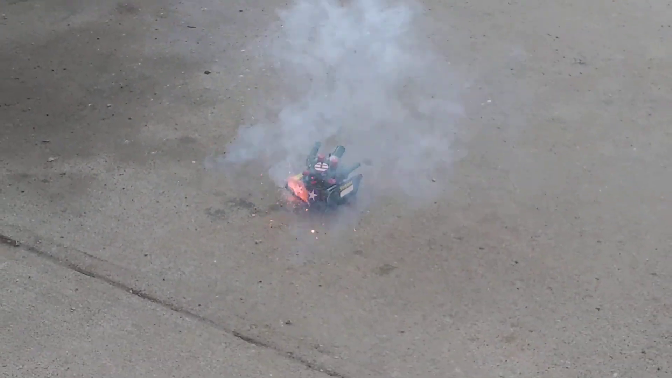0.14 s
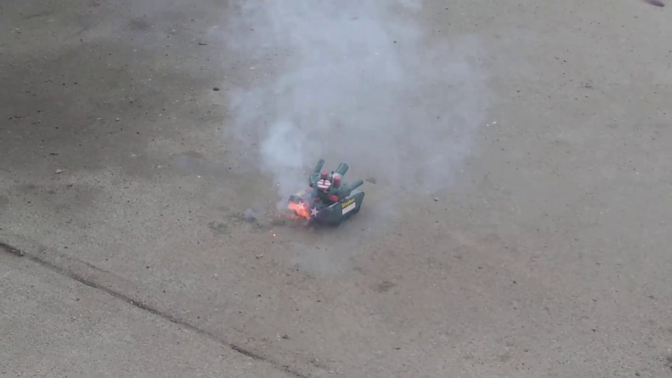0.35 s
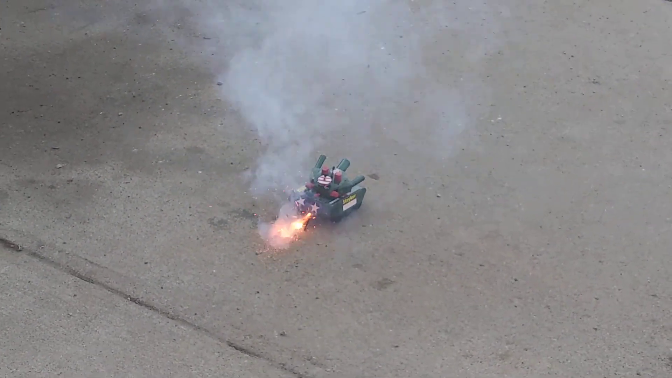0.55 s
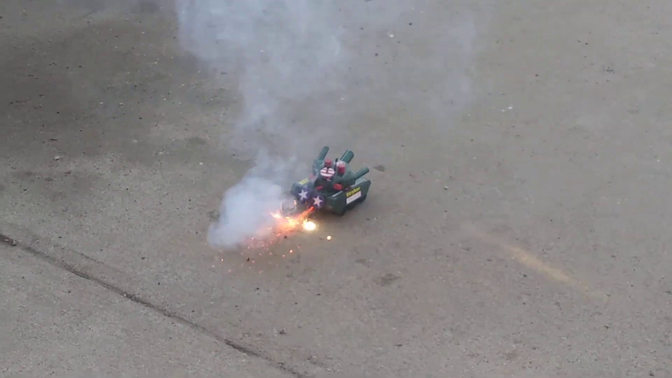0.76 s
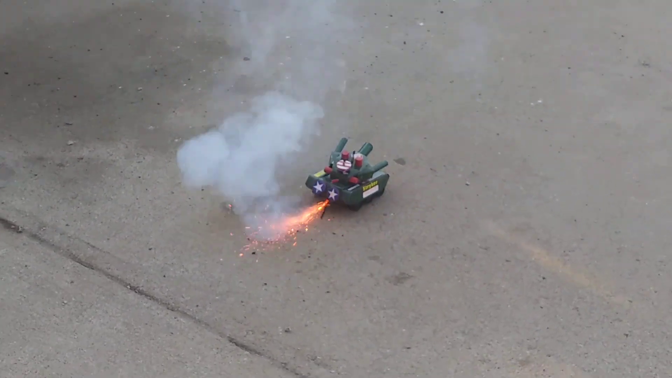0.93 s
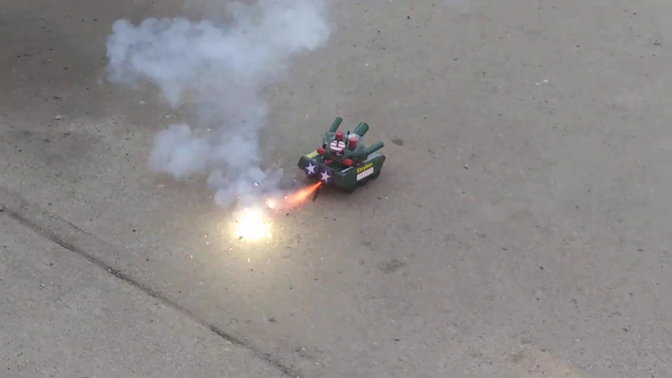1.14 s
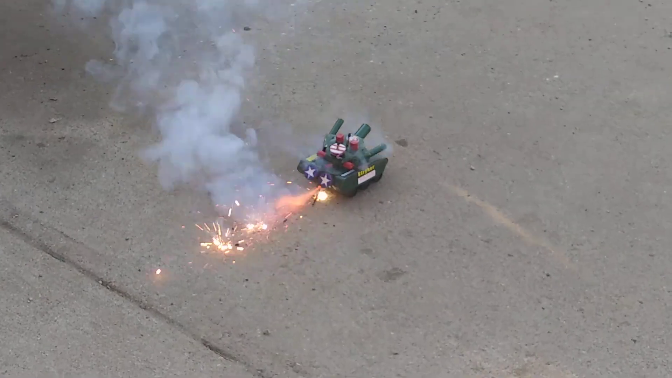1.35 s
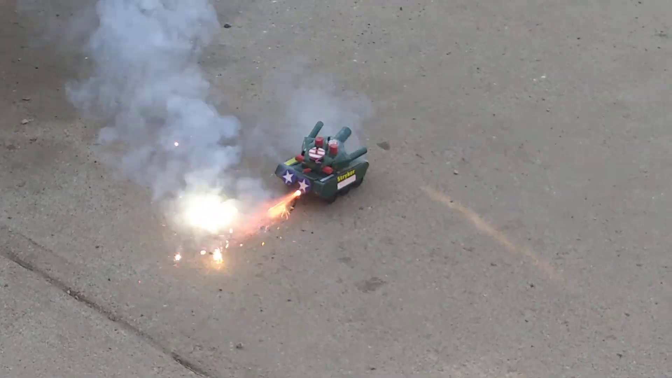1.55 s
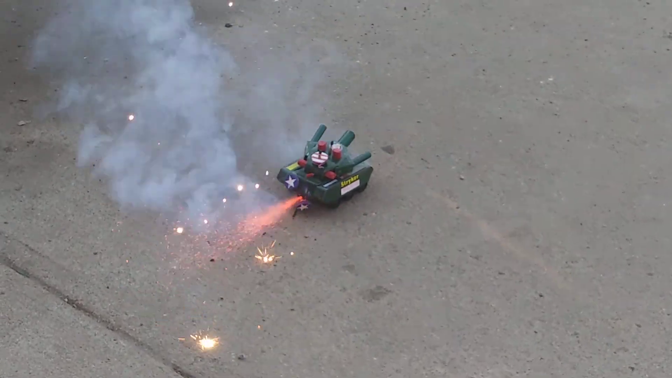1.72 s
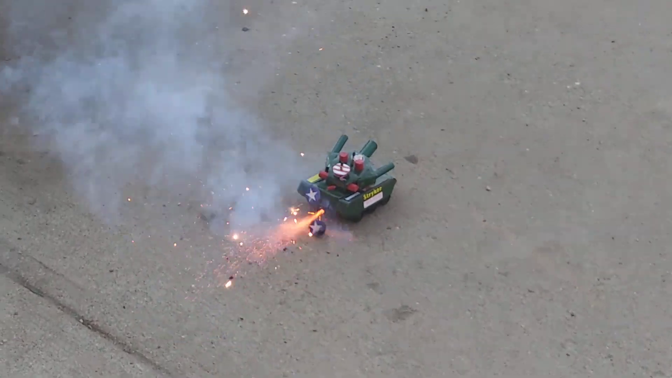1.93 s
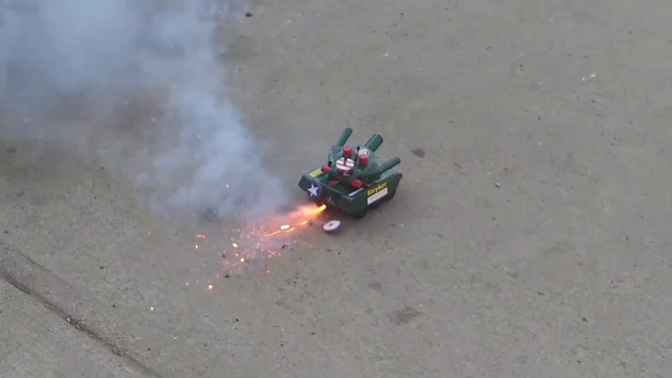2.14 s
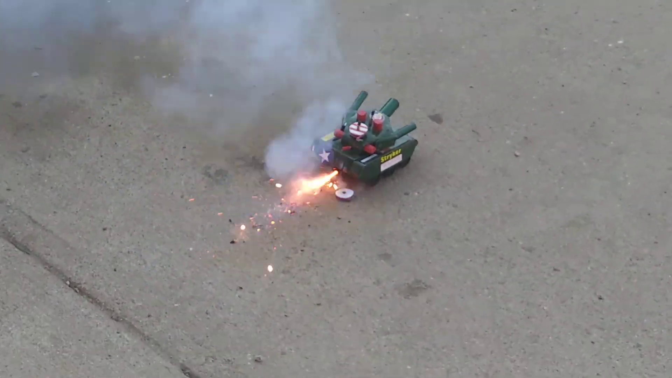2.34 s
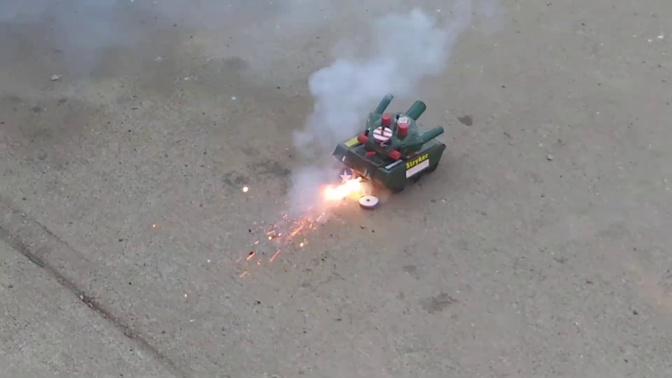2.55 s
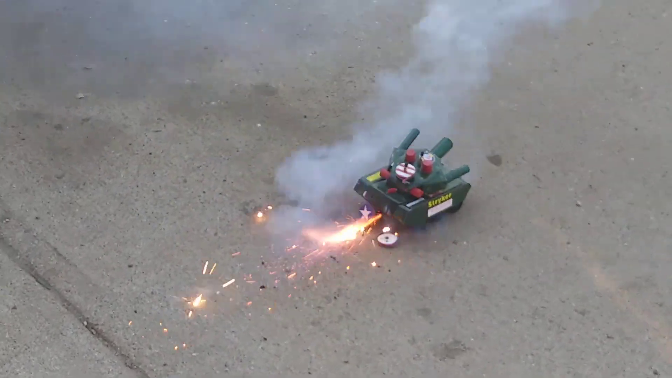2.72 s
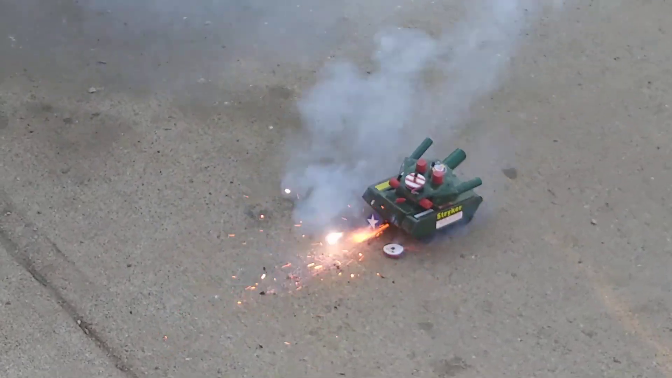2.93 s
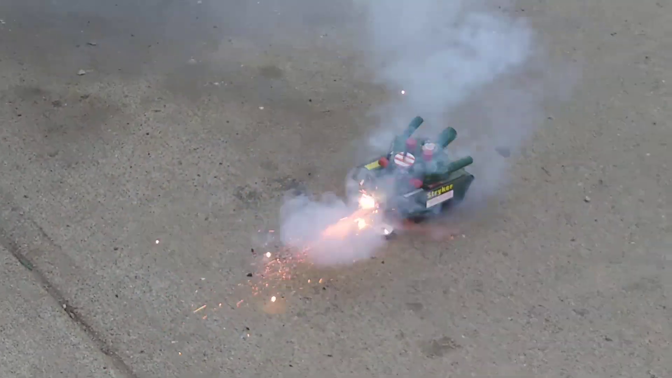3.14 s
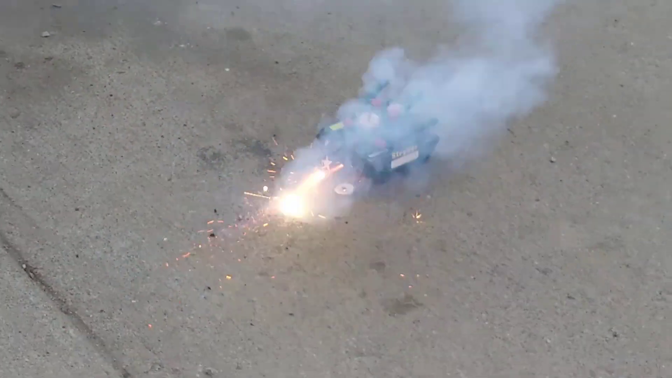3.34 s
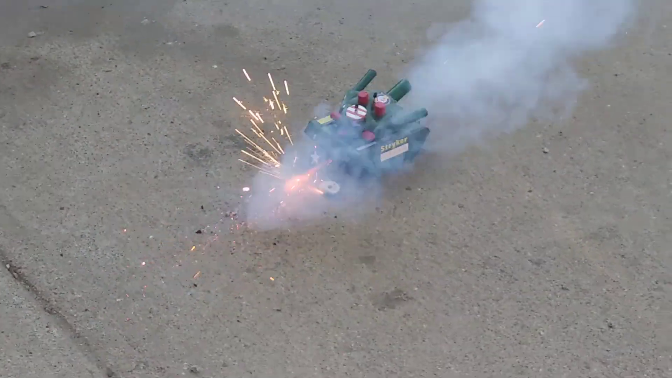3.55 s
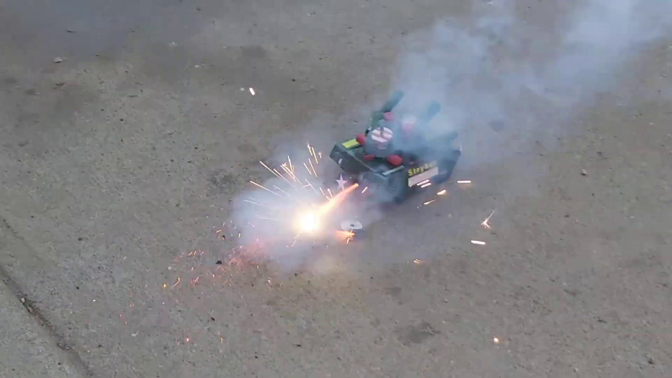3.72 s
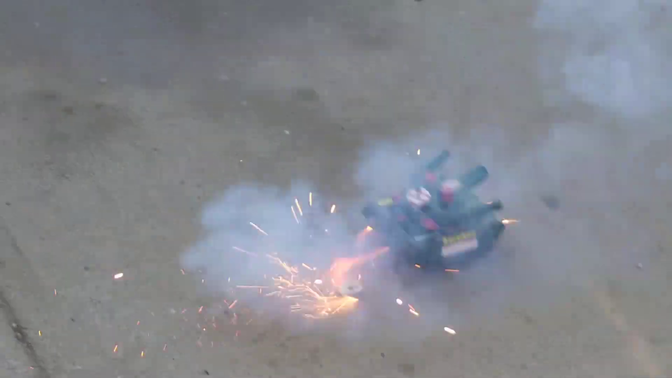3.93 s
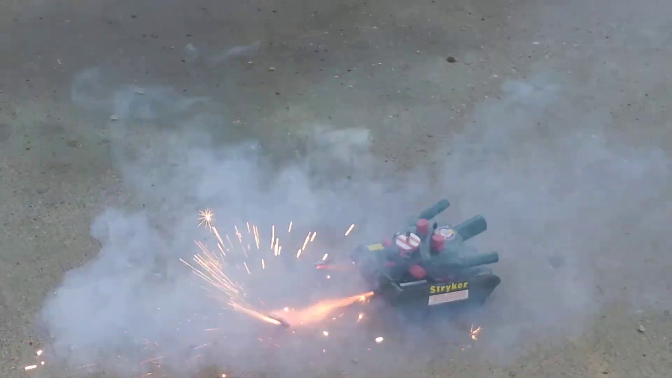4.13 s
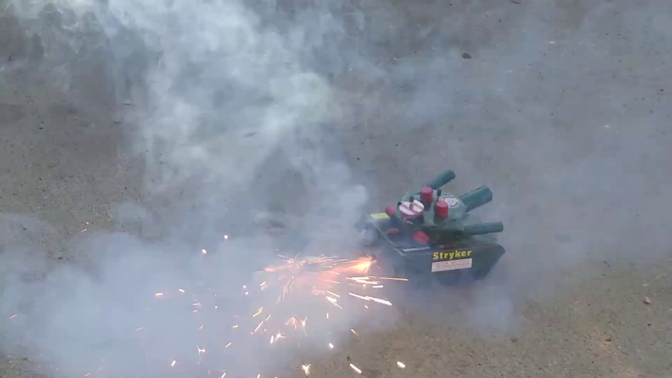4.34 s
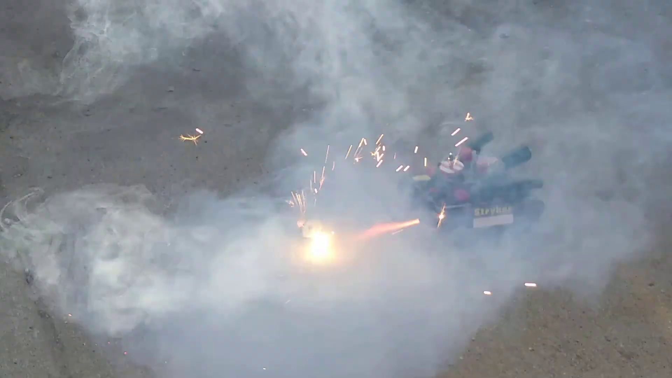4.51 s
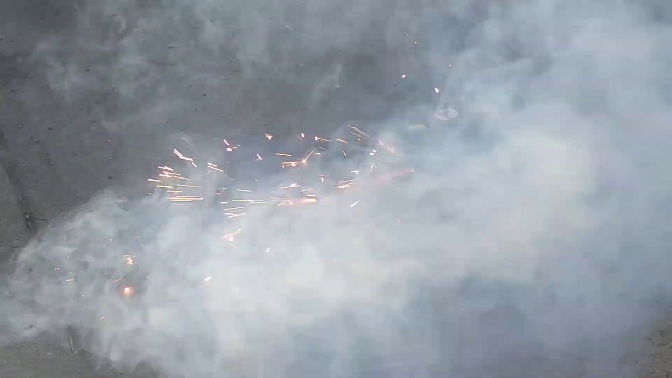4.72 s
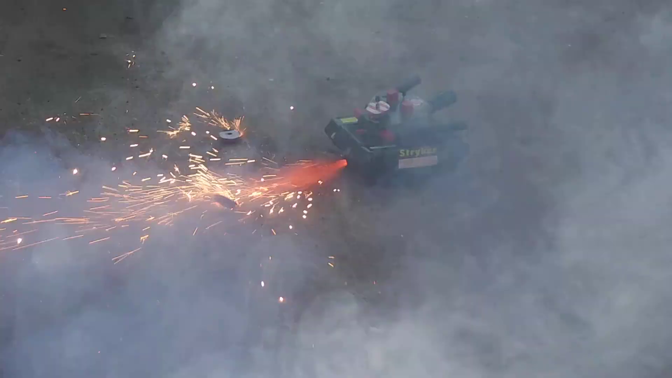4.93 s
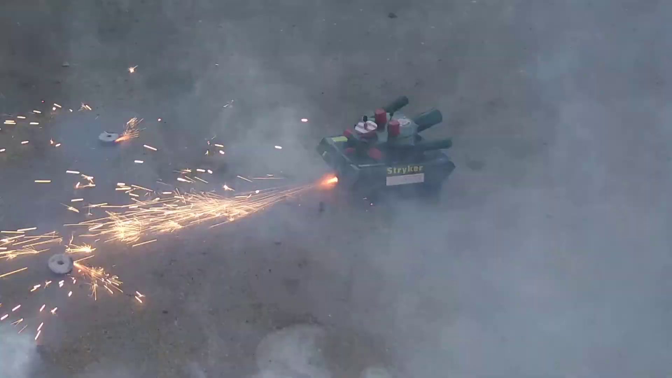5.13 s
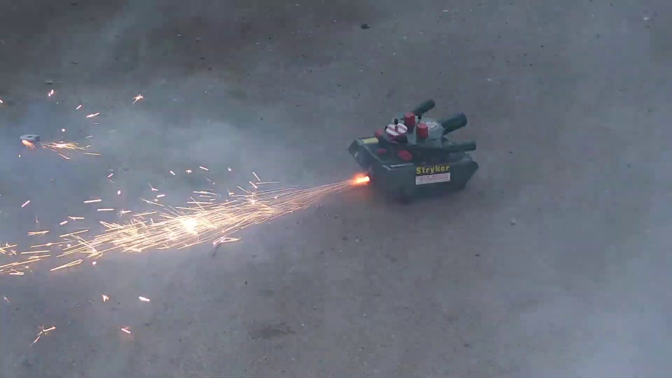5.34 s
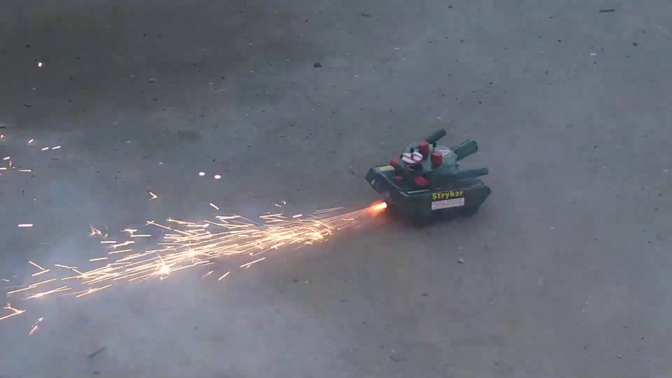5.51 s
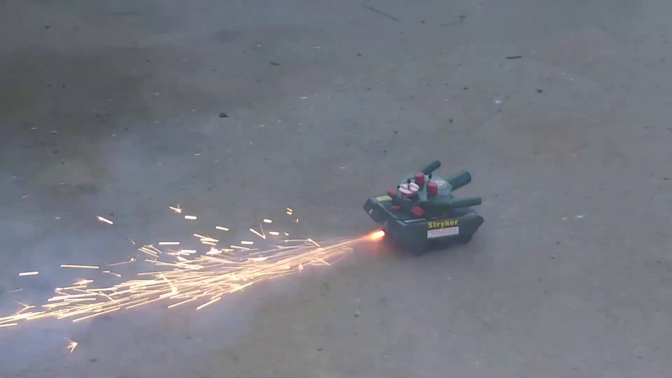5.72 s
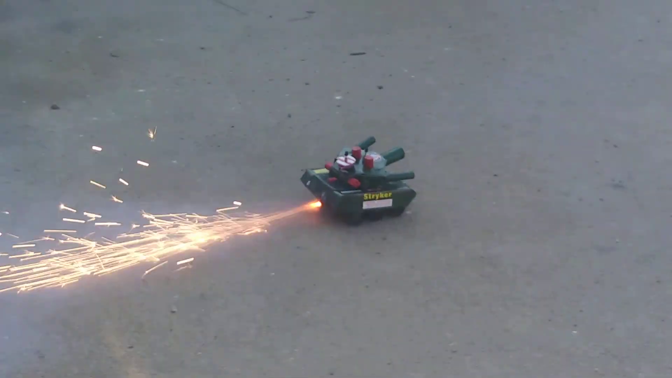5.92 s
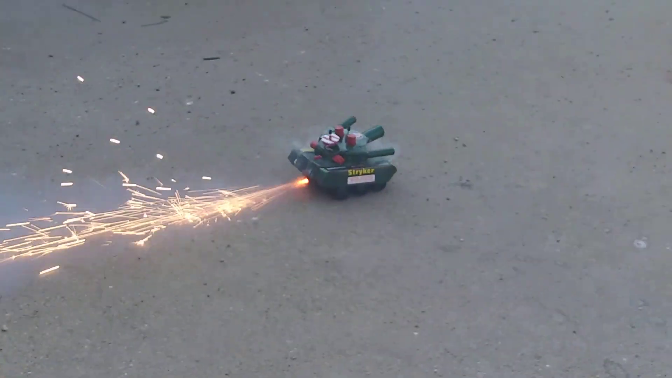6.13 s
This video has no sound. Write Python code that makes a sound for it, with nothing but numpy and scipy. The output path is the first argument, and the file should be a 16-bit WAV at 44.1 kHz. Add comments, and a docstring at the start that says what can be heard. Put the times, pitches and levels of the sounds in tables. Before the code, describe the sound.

A small firework burns on concrete outdoors, close to the microphone. From 0 to 1 s it is a soft, grainy fizz, uneven and crackling, with clusters of tiny dry pops and brief flaring puffs; a brighter sizzle comes in around 0.5 to 1 s. From about 1.1 s it strengthens, and from 1.8 to 3 s it becomes a smoother, narrow jet hiss over a low flutter, still dotted with pops. From 3.3 s it turns rough and sizzling again, swelling steadily, with stronger snaps and rushes near 3.8 to 4.3 s. At about 4.8 s a breathy chirp leaps into a very loud, shrill whistle near 3.9 kHz. It dips, jumps up at 4.9 s, goes hoarse, then slides slowly down to about 3.4 kHz, raspy, wobbling and roaring, slightly overloaded. The roar thickens again near 5.9 s, and the whistle is still sounding at the end. Faint short echoes surround it.

```python
"""A small firework fountain fizzes, spits and flares on concrete, close by: grains of powder make noise
leap and sink, and slag pops out of the nozzle as short pressure swings.
Then a whistle charge catches, screams, turns raspy and slides down in pitch as its tube burns hollow:
a wobbling tone with overtones, half tones and a roar, loud enough to overload the recorder.
Faint scattered echoes come back from the surroundings."""
import sys
import numpy as np
from scipy import signal
from scipy.fft import rfft, irfft
from scipy.io import wavfile

SR = 44100
rng = np.random.default_rng(int(sys.argv[2]) if len(sys.argv) > 2 else 0)


def wav_record(signal):
    """Record a signal, one row per channel, as 16-bit PCM in the file named by sys.argv[1]."""
    frames = np.transpose(np.atleast_2d(signal))
    bounded = np.clip(frames, -1, 1)
    # unit amplitude maps onto the largest positive 16-bit level
    quanta = np.round(bounded * 32767).astype(np.int16)
    wavfile.write(sys.argv[1], SR, quanta)


N = 272097
TIME = np.arange(N) / SR
BINS = np.fft.rfftfreq(N, 1 / SR)

# how fiercely the fountain burns, before trims and dips: time_s, level_db
BURN_STRENGTH = [(0, -47), (.22, -46), (.34, -52), (.47, -45), (.56, -43.5), (.76, -44.5), (.83, -45),
                 (1.03, -44), (1.14, -40), (1.4, -35.5), (1.55, -37), (1.7, -39.5), (2.1, -38.5),
                 (2.22, -36), (2.44, -39.5), (2.51, -35), (3.0, -33), (3.18, -36), (3.28, -31.5),
                 (3.52, -31.5), (3.57, -29.5), (4.1, -29), (4.55, -26.5), (4.75, -22.5)]
# the powder burns through layers, each with its own sound; levels are relative to the flame, before trims:
# start_s, jet_hiss_db, spark_sizzle_db, nozzle_cleanness (0 to 1)
POWDER_LAYERS = [(0, -14, -36, 0.1), (.29, -8.5, -26, 0.03), (.545, -5.5, -16, 0), (.8, 0.5, -14, 0),
                 (.98, -5.5, -21.5, 0.4), (1.8, 0, -31.5, 0.98), (2.65, -2, -23, .88),
                 (3.06, -6.5, -24, 0.64), (3.33, -10.5, -24, 0.26), (3.55, -1, -12.5, 0.06),
                 (3.9, -3.5, -20.5, .05), (4.25, -7.5, -23, 0.2)]
LAYER_BLEND_S = 0.032
# the colour of each noise, all made equally loud later: frequency_hz, level_db (per Hz)
FLAME_SPECTRUM = [(40, -54), (110, -51), (190, -27.5), (290, -13), (450, -7.5), (700, -1.5), (1300, 1.5),
                  (1900, 1.5), (2600, -3), (4000, -7.5), (7000, -34)]
# the hiss of a ragged nozzle: frequency_hz, level_db (per Hz)
RAGGED_HISS_SPECTRUM = [(200, -65), (1500, -13), (3000, -0.5), (4400, 6), (5500, 4.5), (6500, -3),
                        (8000, -9.5), (10000, -48), (15000, -37)]
# the hiss of a cleanly running nozzle, with a low flutter of flame: frequency_hz, level_db (per Hz)
CLEAN_JET_SPECTRUM = [(120, -52), (200, -22), (300, -1), (500, 1.5), (900, -5), (2500, -13), (3500, -6.5),
                      (4300, 3.5), (5300, 3), (6100, -8.5), (7000, -14), (8000, -18), (10000, -39),
                      (15000, -44)]
# the sizzle of sparks: frequency_hz, level_db (per Hz)
SIZZLE_SPECTRUM = [(400, -70), (5000, 10), (8000, 4), (11500, 3.5), (14000, 1), (16000, -13)]
GRAIN_DEPTH_EARLY, GRAIN_DEPTH_LATE = 2.0, .95  # how unevenly the powder burns
CHOKE_DB, CHOKE_S = 2.5, .012  # slag narrows the nozzle just before each flare, and the fountain dips

# slag spat from the nozzle, before the low cut: start_s, peak_db, pitch_hz
SLAG_SPITS = [(.024, -24.5, 1390), (.048, -22, 1510), (.055, -19.5, 1180), (.067, -23, 1270),
              (0.086, -26.5, 1410), (.16, -28, 1360), (.167, -20.5, 2070), (.483, -26, 1310),
              (.509, -31, 1000), (.516, -25, 1180), (.524, -25.5, 1480), (.674, -28.5, 1200),
              (.742, -25, 1600), (.943, -24.5, 1390), (.981, -25, 1390), (1.017, -22, 1260),
              (1.068, -22, 1190), (1.202, -19.5, 1300), (1.238, -25, 1250), (1.508, -17.5, 1560),
              (1.587, -20, 1280), (1.623, -20.5, 1130), (2.001, -20.5, 1200), (2.108, -23, 1340),
              (2.393, -22, 1170), (2.657, -17, 1300), (2.694, -22.5, 1300), (2.773, -19, 1135),
              (3.057, -17.5, 1020), (3.167, -20, 2330), (3.348, -15, 1410), (3.824, -19, 1340),
              (3.868, -17, 1940), (3.918, -17, 1600), (4.139, -14, 1540), (4.194, -15, 1720),
              (4.268, -15.5, 1420), (4.291, -14.5, 1370), (4.732, -13, 1690)]
# grains that flare with a short rush, before their rise and the low cut: start_s, level_db
GRAIN_FLARES = [(.047, -35), (.159, -32.5), (.195, -39.5), (.282, -40.5), (.377, -41.5), (.739, -37.5),
                (0.944, -36), (0.979, -39), (1.019, -39.5), (1.06, -34), (1.239, -29.5), (1.382, -34),
                (1.586, -37), (1.624, -32), (1.742, -33), (1.999, -32.5), (2.1, -32), (2.327, -32),
                (2.477, -31), (2.693, -30.5), (2.772, -30), (2.969, -29), (3.167, -32), (3.82, -27),
                (3.912, -23.5), (4.192, -30)]
# the colour of a flare: frequency_hz, level_db (per Hz)
FLARE_SPECTRUM = [(100, -40), (200, -28), (350, 1), (1500, 3.5), (3500, -4.5), (5500, -4), (7000, -14.5),
                  (8500, -24), (11000, -27), (16000, -32)]
FLARE_RISE_S, FLARE_T60_S = 0.00081, 0.1  # T60: the time to fall by 60 dB, for a full-sized flare
FULL_FLARE_DB = -33.5  # a grain weaker than this burns out sooner, in proportion to its size
# soft low puffs: middle_s, level_db, length_s
GAS_PUFFS = [(1.477, -57, 0.1), (1.695, -53, 0.08)]
# the colour of a puff: frequency_hz, level_db (per Hz)
PUFF_SPECTRUM = [(30, -35), (90, -19), (150, -9), (210, 0), (300, 4), (600, -43)]

# the whistle slides down as its tube burns hollow, with one jump up: time_s, pitch_hz, level_db (before trim)
WHISTLE_PATH = [(4.79, 3938, -9), (4.893, 3715, -13), (4.905, 4068, -17), (5.03, 3957, -15.5),
                (5.2, 3764, -11.5), (5.383, 3655, -12.5), (5.4, 3590, -13.5), (5.67, 3537, -12.5),
                (5.73, 3504, -12), (6.17, 3389, -16.5)]
# overtones, before their sharpness and flicker: multiple_of_pitch, level_db
WHISTLE_OVERTONES = [(2, -12.5), (3, -19.5), (4, -27.5)]
# half tones, balanced against each other before their tilt: multiple_of_pitch, level_db
WHISTLE_HALF_TONES = [(.5, -3.5), (1.5, -3), (2.5, -13), (3.5, -17.5), (4.5, -33)]
# hoarse bands, before their shared level: multiple_of_pitch, half_width_hz, level_db
WHISTLE_HOARSE_BANDS = [(.22, 274, 0), (.5, 170, 1), (1.5, 450, -12)]
# turbulence in the tube: time_s, roar_level_db
TUBE_TURBULENCE = [(4.74, -60), (4.785, -27), (4.81, -42), (4.85, -23.5), (4.92, -17), (5.05, -17.5),
                   (5.35, -22.5), (5.44, -18), (5.55, -22), (5.75, -22), (5.93, -15.5), (6.17, -15.5)]
# the colour of the roar: frequency_hz, level_db (per Hz)
ROAR_SPECTRUM = [(25, -18), (150, -23), (300, -15), (500, -7.5), (900, 0), (1400, 0), (2200, 0),
                 (3100, 0.5), (4300, -5), (6500, -14), (9000, -16.5), (15500, -18.5)]
# the tube first sings breathily, chirps once, then catches
BREATHY_S, BREATHY_DB, BREATHY_RISE_DB_PER_S, BREATHY_FALL_DB_PER_S = 4.767, -20, 350, 600
CHIRP_S, CHIRP_WIDTH_S, CHIRP_DB = 4.773, 0.0082, -5
CATCH_S, CATCH_RISE_S = 4.783, 0.0081
# soon its gas pulses alternate strong and weak; this fades as the charge runs low
SPLIT_S, SPLIT_RISE_S, SPLIT_DB = 4.855, 0.019, -19.5
SPLIT_FADE_S, SPLIT_FADE_DB_PER_S = 5.67, 16.5
# just after the jump the pulses group unevenly, in twos and about fours, and the note is hoarse
JUMP_S, JUMP_RISE_S = 4.897, 0.018
SETTLE_S = .45  # the chaos set off by the jump dies away over this time
HOARSE_DB, HOARSE_FADE_DB_PER_S = -17, 67
# the overtones sharpen quickly on the first note, then slowly again after the jump
FIRST_EDGE_DB, EDGE_SOFT_DB, EDGE_RISE_S = 3, -26, 0.027
SECOND_EDGE_DB, EDGE_DB_PER_S = -4.5, 8
FLICKER_DB = 0.92  # each overtone flickers this much more than the one below it
ORDERLY_DB, CHAOTIC_DB = -23, -15.5  # roar levels where the alternation is regular, and wholly chaotic
ORDERLY_TILT_DB_PER_OCTAVE = -0.5  # a regular alternation favours the lowest half tone

# dips cut by the microphone port: frequency_hz, half_width_hz, level_db
PORT_NOTCHES = [(7150, 110, -15), (9470, 260, -14)]
EDGE_HZ = 15780  # upper limit of the sound


def fountain():
    """Burning grains make flame, jet hiss and sizzle leap together; shared snaps crackle in all but the clean jet."""
    burn_db, = curves(BURN_STRENGTH)
    hiss_db, sizzle_db, clean = stages(POWDER_LAYERS, LAYER_BLEND_S)
    clean = np.clip(clean, 0, 1)
    # the grains burn one by one at first and merge as the fountain grows
    unevenness = np.interp(TIME, [1.7, 3.7], [GRAIN_DEPTH_EARLY, GRAIN_DEPTH_LATE])
    grains = sputter(per_s=130, decay_s=.005, depth=unevenness)
    snaps = unit(sparks(per_s=300, spread_db=3.3) * rng.choice([-1, 1], N))
    # each snap lets go a burst of gas under a millisecond long
    burst_power = signal.lfilter([1], [1, -np.exp(-1 / (.0007 * SR))], snaps ** 2)
    bursts = unit(np.sqrt(burst_power) * noise())
    crackly = np.interp(TIME, [1.8, 3.7], [.95, .55])
    flame = colour(noise() * np.sqrt(grains) + crackly * snaps, FLAME_SPECTRUM)
    ragged = colour(grains * noise() + 0.51 * crackly * bursts, RAGGED_HISS_SPECTRUM)
    narrow = colour(np.sqrt(grains) * noise(), CLEAN_JET_SPECTRUM)
    hiss = np.sqrt(1 - clean) * ragged + np.sqrt(clean) * narrow
    sizzle = colour(grains * noise() + 0.31 * crackly * bursts, SIZZLE_SPECTRUM)
    voices = amp(-1.0) * flame + amp(hiss_db - 2.5) * hiss + amp(sizzle_db - 1.0) * sizzle
    alight = np.interp(TIME, [4.77, 4.85], [1, 0])
    return alight * choke() * amp(burn_db) * voices


def sputter(per_s, decay_s, depth, rise_s=0.00066):
    """A gain of rms 1 that leaps as each grain of powder catches and sinks as it burns out."""
    t = np.arange(SR // 8) / SR
    burst = np.exp(-t / decay_s) * (1 - np.exp(-t / rise_s))
    bursts = signal.fftconvolve(sparks(per_s, spread_db=3.0), burst)[:N]
    return unit(1 + depth * unit(bursts))


def sparks(per_s, spread_db):
    """Random clicks, most small and a few large."""
    sizes_db = spread_db * np.minimum(rng.exponential(1, N), 3.5)
    return (rng.random(N) < per_s / SR) * amp(sizes_db)


def choke():
    """A gain that sinks before each flare and comes back as the nozzle clears."""
    dips = sum(np.exp(-((TIME - s) / CHOKE_S + 1) ** 2) for s, _ in GRAIN_FLARES)
    return amp(-CHOKE_DB * dips)


def spits():
    """Single pops of slag, the short noisy rushes of flaring grains and soft puffs of gas."""
    slag, blaze, swell = np.zeros((3, N))
    for s, db, hz in SLAG_SPITS:
        add(slag, s, amp(db) * pop(hz, decay_s=0.00023))
    t = np.arange(SR // 4) / SR
    for s, db in GRAIN_FLARES:
        t60 = FLARE_T60_S * min(amp(db - FULL_FLARE_DB), 1)
        add(blaze, s, amp(db - 60 * t / t60) * (1 - np.exp(-t / FLARE_RISE_S)))
    for s, db, length in GAS_PUFFS:
        add(swell, s - length / 2, amp(db) * np.hanning(round(length * SR)))
    rushes = blaze * colour(noise(), FLARE_SPECTRUM)
    # so small a source radiates hardly any bass
    low_cut = signal.butter(4, 240, "high", fs=SR, output="sos")
    return signal.sosfilt(low_cut, slag + rushes) + swell * colour(noise(), PUFF_SPECTRUM)


def pop(hz, decay_s):
    """Slag leaving the nozzle: a pressure swing of a cycle or two."""
    t = np.arange(400) / SR
    swing = np.sin(2 * np.pi * hz * t) * t ** 1.5 * np.exp(-t / decay_s)
    return swing / abs(swing).max()


def whistle():
    """The tube's quarter-wave tone; its gas pulses alternate strong and weak, slip, and break into a roar."""
    hz, level_db = curves(WHISTLE_PATH)
    roar_db, = curves(TUBE_TURBULENCE)
    chaos = np.clip((roar_db - ORDERLY_DB) / (CHAOTIC_DB - ORDERLY_DB), 0, 1)
    jumped = ramp(JUMP_S, JUMP_RISE_S)
    chaos = np.maximum(chaos, jumped * (1 - ramp(JUMP_S, SETTLE_S) ** 2))
    # the pitch is more unsteady until the tube has reached its higher note
    unsettled = .011 * (1 - jumped) + 0.00421 * jumped
    jitter = .003 * wander(hz=45) + unsettled * wander(hz=160) + (.003 + .004 * chaos) * wander(hz=700)
    phase = 2 * np.pi * np.cumsum(hz * (1 + jitter)) / SR
    # the alternation holds for some milliseconds, then slips by a pulse and changes sign
    slips = unit(np.tanh(3 * (wander(hz=12) + (.2 + .2 * chaos) * wander(hz=160))))

    first_edge_db = FIRST_EDGE_DB + EDGE_SOFT_DB * np.exp(-since(CATCH_S) / EDGE_RISE_S)
    second_edge_db = SECOND_EDGE_DB + EDGE_DB_PER_S * since(JUMP_S)
    edge_db = (1 - jumped) * first_edge_db + jumped * second_edge_db
    # the wave is steepest while the pulses are alike
    steep = amp(edge_db - 2.6 * (slips ** 2 - 1))
    tone = np.cos(phase)
    for k, db in WHISTLE_OVERTONES:
        flicker_db = FLICKER_DB * (k - 1.5) * wander(hz=45)
        tone = tone + amp(db + flicker_db) * steep * np.sin(round(k) * phase)
    chirp = amp(CHIRP_DB) * np.exp(-((TIME - CHIRP_S) / CHIRP_WIDTH_S) ** 2)
    caught = ramp(CATCH_S, CATCH_RISE_S) + chirp
    unsteady_db = 0.78 * wander(hz=119.4) + 0.75 * jumped * wander(hz=16)
    tone *= caught * amp(level_db + unsteady_db + 3.0)

    halves = 0
    for k, db in WHISTLE_HALF_TONES:
        angle = round(2 * k) / 2 * phase
        tilt = amp(ORDERLY_TILT_DB_PER_OCTAVE * np.log2(k))
        locked = tilt * slips * np.sqrt(2) * np.cos(angle + np.pi / 4)
        loose = smeared(angle, width_hz=140)
        halves = halves + amp(db) * (np.sqrt(1 - chaos) * locked + np.sqrt(chaos) * loose)
    split_db = SPLIT_DB - SPLIT_FADE_DB_PER_S * since(SPLIT_FADE_S)
    halves = unit(halves) * ramp(SPLIT_S, SPLIT_RISE_S) * amp(split_db)

    hoarse = sum(amp(db) * smeared(k * phase, width) for k, width, db in WHISTLE_HOARSE_BANDS)
    hoarse *= jumped * amp(HOARSE_DB - HOARSE_FADE_DB_PER_S * since(JUMP_S))
    breathy_rise_db = BREATHY_RISE_DB_PER_S * np.maximum(BREATHY_S - TIME, 0)
    breathy_db = BREATHY_DB - breathy_rise_db - BREATHY_FALL_DB_PER_S * since(BREATHY_S)
    breathy = amp(breathy_db) * smeared(phase, width_hz=220)
    roar = amp(roar_db) * colour(noise(), ROAR_SPECTRUM) * (TIME > TUBE_TURBULENCE[0][0])
    return tone + halves + hoarse + breathy + roar


def smeared(angle, width_hz):
    """A partial of rms 1 whose size and phase drift at random."""
    return wander(width_hz) * np.cos(angle) + wander(width_hz) * np.sin(angle)


def yard(x, wet_db, t60):
    """Faint echoes from the surroundings: sparse random repeats that die away."""
    t = np.arange(SR // 3) / SR
    scattered = rng.standard_normal(len(t)) * (rng.random(len(t)) < .05)
    taps = scattered * (t > .006) * amp(-60 * t / t60)
    return x + amp(wet_db) * signal.fftconvolve(x, taps / np.linalg.norm(taps))[:N]


def noise():
    """White noise."""
    return rng.standard_normal(N)


def wander(hz):
    """Slow random drift of rms 1, with changes up to about hz."""
    return unit(irfft(rfft(noise()) / np.sqrt(1 + (BINS / hz) ** 4), N))


def colour(x, spectrum):
    """Gives a signal a spectrum, at rms 1."""
    hz, db = np.transpose(spectrum)
    gain = amp(np.interp(np.log(BINS + 1), np.log(hz), db))
    return unit(irfft(rfft(x) * gain, N))


def amp(db):
    """Decibels to gain."""
    return 10 ** (np.asarray(db) / 20)


def unit(x):
    """Scales to rms 1 (rms is the average strength)."""
    return x / np.sqrt(np.mean(x ** 2) + 1e-20)


def add(mix, s, sound):
    """Adds a sound to the mix at s seconds."""
    part = mix[max(round(s * SR), 0):][:len(sound)]
    part += sound[:len(part)]


def since(s):
    """Seconds gone by since s, zero before."""
    return np.maximum(TIME - s, 0)


def ramp(s, rise_s):
    """Goes from 0 to 1, starting at s."""
    return np.minimum(since(s) / rise_s, 1)


def curves(rows):
    """The columns of a table of (time_s, ..), joined by straight lines."""
    s, *columns = np.transpose(rows)
    return [np.interp(TIME, s, c) for c in columns]


def stages(rows, blend_s):
    """The columns of a table of (start_s, ..), each value held until it blends into the next."""
    starts, *columns = np.transpose(rows)
    held = []
    for c in columns:
        steps = zip(starts[1:], np.diff(c))
        held.append(c[0] + sum(step * ramp(s - blend_s / 2, blend_s) for s, step in steps))
    return held


def scene():
    """The firework and its echoes, straight ahead."""
    mono = yard(fountain() + spits() + whistle(), wet_db=-15.0, t60=0.32)
    return np.array([mono, mono])


def record(dry, ceiling=0.51):
    """Overload flattens the loudest peaks; the microphone port cuts two notches; then the treble is cut off."""
    bins = np.fft.rfftfreq(2 * N, 1 / SR)
    port_db = sum(db / (1 + ((bins - hz) / width) ** 2) for hz, width, db in PORT_NOTCHES)
    squeezed = dry / (1 + (dry / ceiling) ** 8) ** (1 / 8)
    coloured = irfft(rfft(squeezed, 2 * N) * amp(port_db))[:, :N]
    treble_cut = signal.firwin(511, EDGE_HZ, window=("kaiser", 9), fs=SR)
    return signal.oaconvolve(coloured, treble_cut[None], "same")


dry = scene()
out = record(dry)
wav_record(out)
```